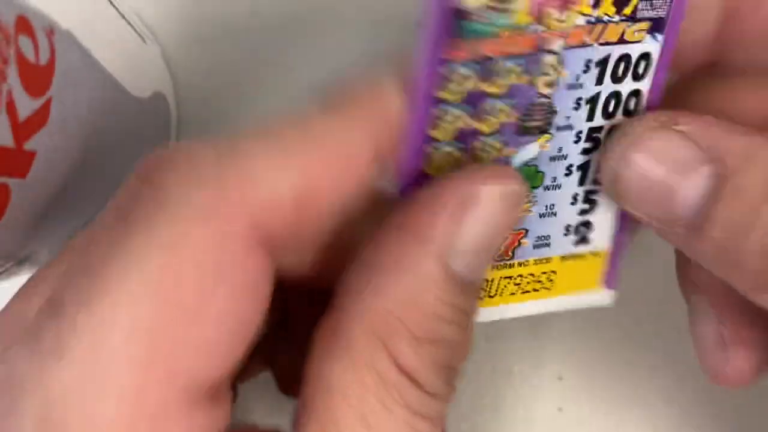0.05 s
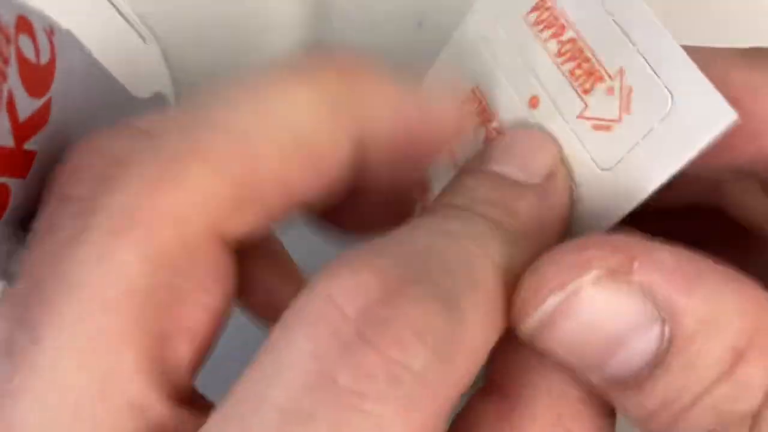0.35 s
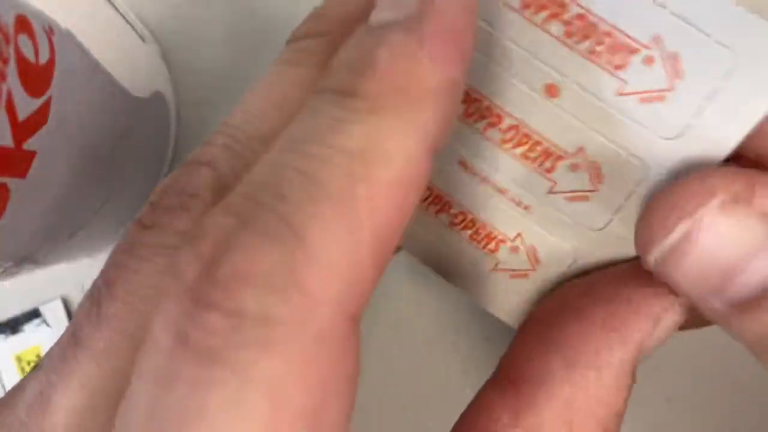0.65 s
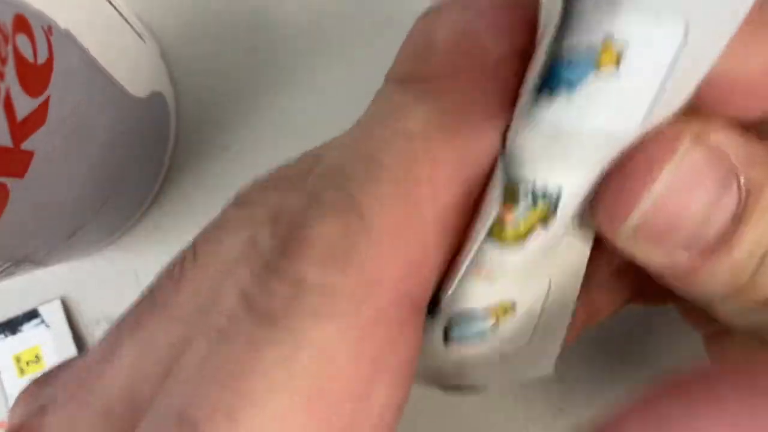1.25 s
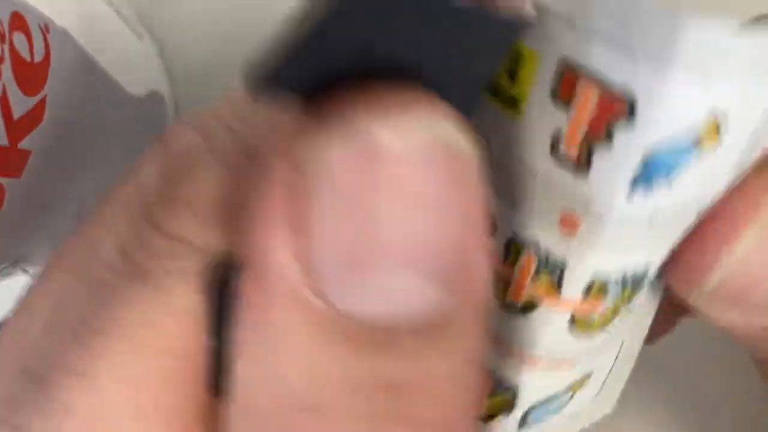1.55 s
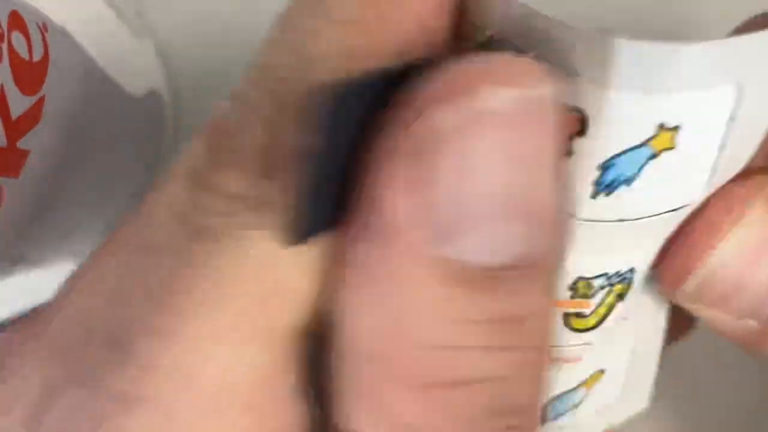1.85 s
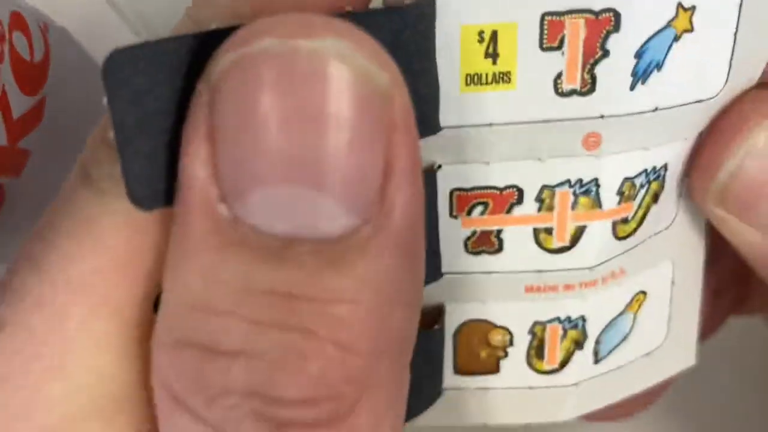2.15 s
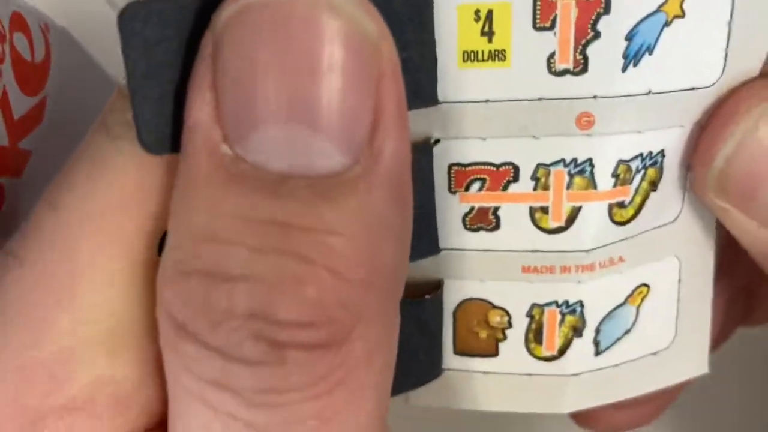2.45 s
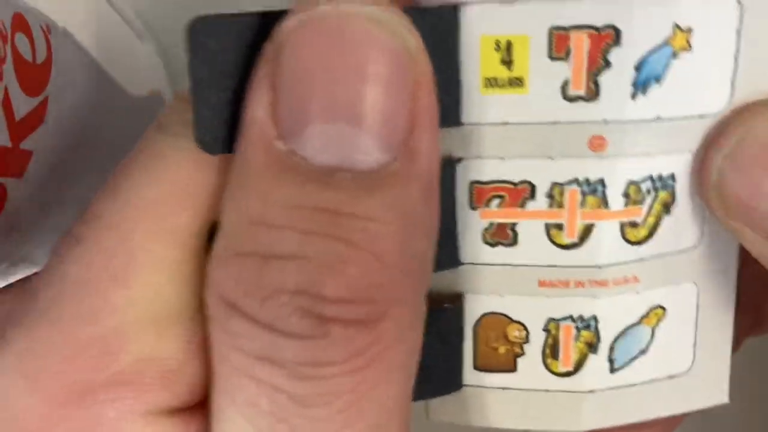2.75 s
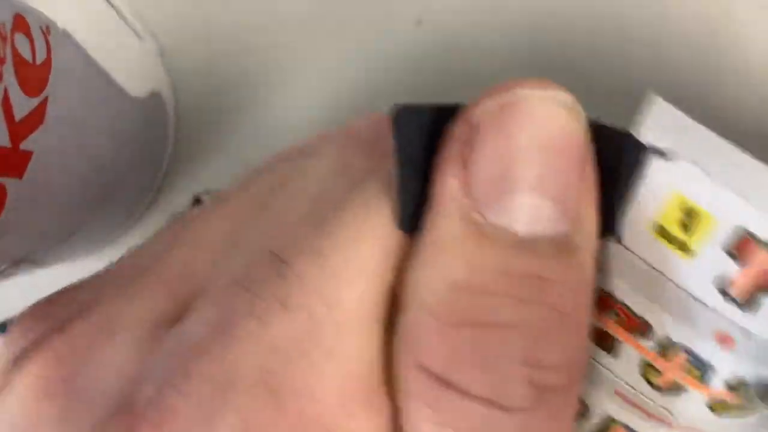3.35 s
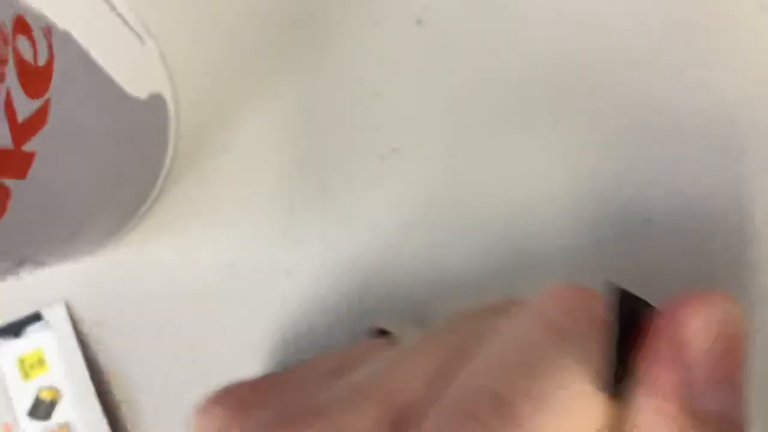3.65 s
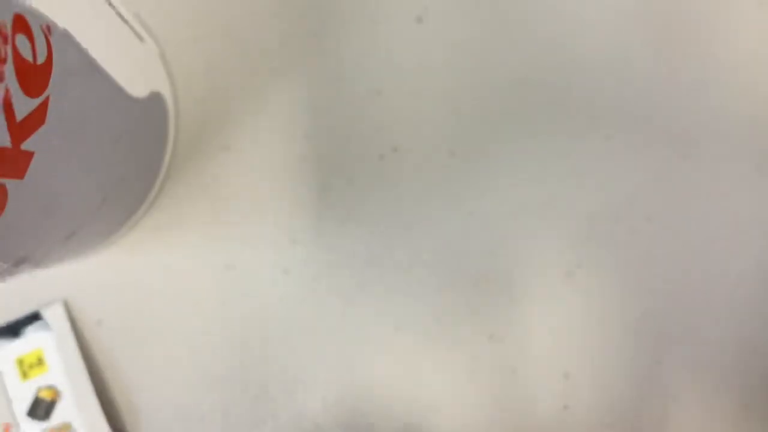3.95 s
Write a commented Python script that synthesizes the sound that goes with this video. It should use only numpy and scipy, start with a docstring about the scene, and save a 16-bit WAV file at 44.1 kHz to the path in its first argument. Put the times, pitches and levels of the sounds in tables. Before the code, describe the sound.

A stiff paper card rustles in the hands, creaks, and its tabs snap open in two short bursts. Light handling follows, then a brisk flick with snaps and soft knocks, heard up close in a small, humming room.

```python
"""Hands turn a stiff paper card close to the microphone and pull its perforated tabs open.
Over room rumble and hum, fingers slide and nails tick on the card; it bends and creaks at 0.9 s.
Paper bridges break in two quick runs of snaps, at 1.0 and 1.4 s; a limiter ducks after the loudest.
Two more snaps follow by 1.9 s, then light handling and a second creak at 2.8 s.
Near 3.45 s the card flicks with snaps, a sharp slide and knocks; faint knocks and slides end it."""
import sys
import numpy as np
from scipy import signal
from scipy.fft import rfft, irfft, next_fast_len
from scipy.io import wavfile
from scipy.ndimage import uniform_filter1d, minimum_filter1d, map_coordinates

SR = 44100
rng = np.random.default_rng(int(sys.argv[2]) if len(sys.argv) > 2 else 0)


def master(y):
    """Save y as 16-bit WAV."""
    cut = np.clip(np.atleast_2d(y).T, -1, 1)
    pcm = np.round(cut * 32767)  # scale
    wavfile.write(sys.argv[1], SR, pcm.astype(np.int16))


N = 4 * SR

# Ventilation noise. Each row: frequency in Hz, relative density in dB.
ROOM_SPECTRUM = [(15, -48), (25, -29), (53, 3), (170, -9.5), (260, -6), (600, -17), (800, -17),
                 (1270, -26.5), (2010, -31), (3530, -38.5), (15500, -49)]
# Room noise above the bass. Each row: time in seconds, relative level in dB.
ROOM_LEVEL = [(0, -34), (.4, -35), (.8, -36), (1.2, -35), (2.1, -38.5), (3, -38.5), (4, -39.5)]
# Room width. Each row: frequency in Hz, left-right correlation.
ROOM_CORRELATION = [(60, 0.96), (150, 0.77), (380, 0.19), (950, -0.76), (2380, 0.23), (5980, -0.4),
                    (15000, 0.016)]
# Machine hum. Each row: frequency in Hz, level in dB.
HUM_TONES = [(64, -47.5), (120, -48.5), (156, -53), (261, -55.5), (331, -54)]
# Wall reverberation. Each row: frequency in Hz, T60 in seconds.
WALL_T60 = [(200, 0.11), (3000, 0.19), (8000, 0.27), (15000, 0.16)]
# Balance of room and card. Each row: frequency in Hz, left minus right in dB.
ROOM_PAN = [(100, 1.5), (300, -2.5), (1500, -1), (6000, -0.5)]
BODY_PAN = [(200, 1), (600, -1.5), (1100, -38), (2800, -12), (4500, -12.5), (6500, 0.5)]
# Resonances of the held card. Each row: frequency in Hz, width in Hz, gain in dB.
CARD_MODES = [(1140, 160, -8), (2200, 120, -8), (2890, 190, -6.5), (3840, 420, -7.5)]
# Spectra of slides (hiss, rub) and snaps (crack, body).
# Each row: frequency in Hz, relative density in dB.
HISS_SPECTRUM = [(1000, -56), (3800, 3.5), (6000, -11.5), (7300, 10.5), (9000, 7), (12000, 6), (15600, 4),
                 (16300, -35)]
RUB_SPECTRUM = [(150, -19), (500, 6.5), (1200, 10.5), (1700, 6.5), (2500, 7), (4000, -1), (6000, -4.5),
                (9000, -19)]
CRACK_SPECTRUM = [(1000, -29), (4500, -23), (6000, -4), (7600, 7.5), (9300, 2), (11500, 2.5), (13500, -2.5),
                  (15500, -2), (16800, -16.5)]
BODY_SPECTRUM = [(100, 3), (350, 2.5), (900, 2), (1700, -2.5), (2400, -2.5), (3100, -3), (3900, -0.5),
                 (5500, -6), (7500, -9.5), (12000, -61)]
# Skin and card sliding on card. Each row: peak time, rise and fall in seconds, hiss and rub in dB.
SLIDES = [(.06, 0.043, 0.066, -51, -63), (.315, 0.041, 0.029, -47.5, -49.5),
          (0.441, 0.015, 0.0071, -37, -34.5), (.475, 0.063, 0.016, -46.5, -67),
          (0.567, 0.021, 0.0076, -37, -42.5), (.65, 0.036, 0.035, -49.5, -71),
          (.97, 0.066, 0.13, -44, -48.5), (1.28, 0.052, 0.04, -37, -50.5),
          (1.396, 0.033, 0.025, -31.5, -48), (1.439, .014, 0.015, -46, -37),
          (1.68, 0.23, 0.049, -45.5, -50.5), (1.753, 0.024, 0.021, -40, -44.5),
          (1.83, 0.026, 0.026, -39.5, -56), (1.96, 0.061, 0.038, -39.5, -52),
          (2.07, 0.046, 0.039, -48.5, -52.5), (2.83, 0.037, 0.075, -53, -52),
          (3.05, 0.079, 0.049, -44, -59), (3.14, .04, 0.067, -52, -60), (3.335, 0.079, 0.074, -40, -47),
          (3.451, 0.015, 0.019, -22, -39), (3.467, 0.011, 0.0062, -16.5, -27.5),
          (3.496, 0.047, 0.0056, -30, -40), (3.82, 0.11, 0.11, -56, -52),
          (3.984, 0.065, 0.018, -43.5, -53.5)]
# Soft knocks of card and fingers. Each row: start in seconds, level in dB, pitch in Hz.
KNOCKS = [(.441, -27, 1270), (0.478, -20.5, 1180), (0.96, -26.5, 816), (1.4033, -15.5, 920),
          (1.8659, -12, 860), (3.4436, -16, 1100), (3.452, -15.5, 980), (3.455, -28, 820),
          (3.453, -11.5, 246), (3.467, -18.5, 320), (3.5403, -24, 725), (3.676, -36, 775),
          (3.803, -34, 730)]
# Creaks of the bent card. Each row: start and end in seconds, first and last slip in dB.
CREAKS = [(0.8821, 0.977, -40, -31), (2.8394, 2.889, -29.5, -56)]
# Ticks of nails and card edges. Each row: start in seconds, crack and body in dB.
TICKS = [(0.1979, -34, -34), (0.282, -47, -39), (.4375, -30, -41), (.4774, -26.5, -48), (0.568, -29, -50),
         (.937, -19, -26), (.958, -29, -33), (0.9772, -30, -29), (1.053, -26, -29), (1.085, -20, -22),
         (1.701, -31, -38), (1.736, -32, -28), (1.975, -28, -46), (2.029, -33, -43), (2.0746, -17, -35),
         (2.246, -42.5, -52), (2.3309, -34.5, -38), (2.423, -35.5, -59), (2.814, -40, -35),
         (3.225, -38, -60), (3.254, -31, -58), (3.27, -28.5, -42), (3.343, -23.5, -37), (3.401, -23, -58)]
# Bridges breaking, creases popping.
# Each row: start in seconds, crack and body in dB, length in seconds, flap low cut in Hz.
SNAPS = [(0.9801, -4, -23.5, 0.0028, 1500), (0.9964, 3, -13, 0.0027, 1600), (1.0113, -7, -16, 0.0042, 1100),
         (1.036, -1.5, -19, 0.0055, 900), (1.0409, 3, -13.5, 0.0015, 750),
         (1.3777, -4.5, -15.5, 0.0017, 298), (1.3834, -4.5, -15, 0.002, 150),
         (1.392, -8.5, -15.5, 0.0024, 450), (1.4034, -2, -23, 0.00099, 150), (1.4139, 2, -8.5, 0.0032, 597),
         (1.4252, -5, -13.5, 0.0019, 800), (1.431, 1.5, -10, 0.0024, 590), (1.7316, -12, -24, 0.003, 400),
         (1.866, -5.5, -12, 0.0021, 120), (3.4428, -7, -19.5, 0.0043, 500),
         (3.4505, -7.5, -27, 0.0032, 200), (3.4712, -7, -22, 0.0022, 700)]


def amp(db):
    """Decibels to gain."""
    return 10 ** (np.asarray(db) / 20)


def unit(x):
    """Scale to rms 1."""
    return x / np.sqrt(np.mean(x ** 2) + 1e-20)


def along(points, hz):
    """Interpolate (Hz, value) points on a log axis."""
    knots_hz, values = np.transpose(points)
    return np.interp(np.log(hz + 1), np.log(knots_hz + 1), values)


def wobble(knots_per_s):
    """Smooth random curve."""
    return map_coordinates(rng.standard_normal(N // 8), [np.arange(N) * knots_per_s / SR], mode="wrap")


def filtered(x, response):
    """Apply a complex response, a function of Hz."""
    size = next_fast_len(N + SR // 2)
    return irfft(rfft(x, size) * response(np.fft.rfftfreq(size, 1 / SR)), size)[..., :N]


def coloured(x, spectrum, size=2048):
    """Apply a minimum-phase filter of unit energy."""
    cepstrum = irfft(np.log(amp(along(spectrum, np.fft.rfftfreq(size, 1 / SR)))))
    cepstrum[1:size // 2] *= 2
    cepstrum[size // 2 + 1:] = 0
    impulse = irfft(np.exp(rfft(cepstrum)))
    return signal.fftconvolve(x, impulse / np.linalg.norm(impulse))[:N]


def add(track, start_s, sound):
    """Mix a sound into a track."""
    i = int(np.clip(round(start_s * SR), 0, N))
    track[i:i + len(sound)] += sound[:N - i]


def strike(t, rise_s, decay_s):
    """Linear rise, exponential fall, peak 1."""
    return np.clip(t / rise_s, 0, 1) * np.exp(-np.maximum(t - rise_s, 0) / decay_s)


def placed(x, right_lag_ms=0, pan=((1, 0),)):
    """Place a sound in stereo by delay and balance."""
    sides = np.array([[1], [-1]])
    def response(hz):
        gain = amp(sides * along(pan, hz) / 2)
        delay = np.exp(1j * np.pi * sides * hz * right_lag_ms / 1000)
        return gain / np.sqrt(np.mean(gain ** 2, 0)) * delay
    return filtered(x, response)


def ventilation(patch_db=2.5, bass_db=-41, bass_hz=110, gain_db=1):
    """Air rumbles in slow patches; the bass holds while the rest eases down."""
    def mid_side(hz):
        angle = np.arccos(np.clip(along(ROOM_CORRELATION, hz), -1, 1)) / 2
        return amp(along(ROOM_SPECTRUM, hz)) * np.array([np.cos(angle), np.sin(angle)])
    bins = signal.stft(rng.standard_normal((2, N)), nperseg=2048)[2]
    patches = uniform_filter1d(rng.standard_normal(bins.shape[1:]), size=3, axis=0)
    patches = unit(uniform_filter1d(patches, size=5, axis=1))
    noise = signal.istft(bins * amp(patch_db * patches), nperseg=2048)[1][:, :N]
    mid, side = filtered(noise, mid_side)
    air = unit(np.array([mid + side, mid - side]))
    bass = filtered(air, lambda hz: 1 / (1 + (hz / bass_hz) ** 4))
    upper_db = np.interp(np.arange(N) / SR, *np.transpose(ROOM_LEVEL))
    return amp(gain_db) * (amp(bass_db) * bass + amp(upper_db) * (air - bass))


def machine_hum(waver_db=3.5, drift_rad=1.26):
    """Low machine tones waver in level and phase."""
    t, hum = np.arange(N) / SR, np.zeros(N)
    for hz, db in HUM_TONES:
        peak = np.sqrt(2) * amp(db + waver_db * wobble(6))
        hum += peak * np.sin(2 * np.pi * hz * t + drift_rad * wobble(5.9))
    return hum


def echoes(x, wall_db, desk_db):
    """Quick scatter from desk and hands, then the faint tail of the walls."""
    hz, frame_s, bins = signal.stft(rng.standard_normal((2, SR // 3)), SR, nperseg=256)
    decay = amp(-60 * frame_s / along(WALL_T60, hz)[:, None])
    tail = signal.istft(bins * decay, SR, nperseg=256)[1]
    t = np.arange(tail.shape[1]) / SR
    desk = rng.standard_normal(tail.shape) * strike(t, rise_s=0.0028, decay_s=0.0013)
    tail *= amp(wall_db) / np.linalg.norm(tail[0])
    desk *= amp(desk_db) / np.linalg.norm(desk[0])
    return signal.fftconvolve(x[None], tail + desk, axes=1)[:, :N]


def card_ring(x):
    """The stiff card adds short resonances to whatever excites it."""
    def response(hz):
        return 1 + sum(amp(db) * 1j * hz * width_hz / (mode_hz ** 2 - hz ** 2 + 1j * hz * width_hz)
                       for mode_hz, width_hz, db in CARD_MODES)
    return filtered(x, response)


def slides(grains_per_s=840, catches_per_s=150, catch_db=-9.5):
    """Strokes swell and fade; the paper's grain flutters and catches under them."""
    t, hiss_power, rub_power = np.arange(N) / SR, np.zeros(N), np.zeros(N)
    for peak_s, rise_s, fall_s, hiss_db, rub_db in SLIDES:
        swell = np.exp(-2 * ((t - peak_s) / np.where(t < peak_s, rise_s, fall_s)) ** 2)
        hiss_power += amp(hiss_db) ** 2 * swell
        rub_power += amp(rub_db) ** 2 * swell
    flutter = wobble(grains_per_s) + 0.59 * wobble(90)
    caught = rng.random(N) < catches_per_s / SR
    catches = amp(catch_db) * unit(caught * rng.uniform(-1.13, 1, N))
    def grain(depth_db):
        return unit(unit(amp(depth_db * flutter) * rng.standard_normal(N)) + catches)
    hiss = coloured(np.sqrt(hiss_power) * grain(depth_db=2.5), HISS_SPECTRUM)
    rub = coloured(np.sqrt(rub_power) * grain(depth_db=3), RUB_SPECTRUM)
    return hiss, rub


def knocks(rise_s=0.00054, decay_at_1khz_s=0.002, scuff_db=-7):
    """The hand-damped card rings for a few cycles with a little scuff."""
    ring, scuff, t = np.zeros(N), np.zeros(N), np.arange(SR // 16) / SR
    for start_s, db, hz in KNOCKS:
        envelope = amp(db) * strike(t, rise_s, decay_at_1khz_s * np.sqrt(1000 / hz))
        add(ring, start_s, envelope * np.sin(2 * np.pi * hz * t))
        add(scuff, start_s, envelope * rng.standard_normal(len(t)))
    return ring + amp(scuff_db) * coloured(scuff, RUB_SPECTRUM)


def fibre_ticks(per_s=12, crack_db=-46.5):
    """Tick rows: fibres of the held card tick at random, with no body."""
    times_s = rng.random(200)[:int(per_s * N / SR)] * N / SR
    return [(start_s, crack_db, -np.inf) for start_s in times_s]


def creaks(gap_s=0.0103, jitter_s=0.00074, body_offset_db=-1.5):
    """Tick rows: the bent card slips almost regularly, growing or fading along each run."""
    rows = []
    for start_s, end_s, first_db, last_db in CREAKS:
        for slip_s, draw in zip(np.arange(start_s, end_s, gap_s), rng.standard_normal(20)):
            db = np.interp(slip_s, [start_s, end_s], [first_db, last_db])
            rows.append((slip_s + jitter_s * draw, db, db + body_offset_db))
    return rows


def stray_fibres(per_snap=4, scatter_s=0.0043, offset_db=-36):
    """Tick rows: a few fibres part weakly around each snap."""
    return [(start_s + scatter_s * draw, crack_db + offset_db, body_db + offset_db)
            for start_s, crack_db, body_db, *_ in SNAPS for draw in rng.standard_normal(per_snap)]


def snaps_and_ticks(tick_s=0.0017, tick_low_hz=350, lead_s=0.008):
    """A break opens with a bright crack; the flap buzzes until the bridge parts, then stops dead."""
    body_rise_s, body_decay_s = 0.0013, 0.00065
    crack, body, t = np.zeros(N), np.zeros(N), np.arange(SR // 32) / SR - lead_s
    faint_ticks = fibre_ticks()
    ticks = [(*row, tick_s, tick_low_hz) for row in TICKS + stray_fibres() + creaks() + faint_ticks]
    lead_in = amp(-46) * np.exp(-np.abs(t) / 0.00057)  # faint, very short swell of noise into each snap
    for start_s, crack_db, body_db, length_s, low_hz in SNAPS + ticks:
        noise = np.sign(rng.standard_normal((2, len(t))))
        burst = strike(t, rise_s=0.00028, decay_s=0.49 * length_s)
        buzz = np.clip(t / body_rise_s, 0, 1) * np.exp(-np.maximum(t - length_s, 0) / body_decay_s)
        low_cut = signal.butter(2, low_hz, "high", fs=SR)
        flap = signal.lfilter(*low_cut, (lead_in + buzz) * noise[1])
        add(crack, start_s - lead_s, amp(crack_db) * (lead_in + burst) * noise[0])
        add(body, start_s - lead_s, amp(body_db) * flap)
    return coloured(crack, CRACK_SPECTRUM), coloured(body, BODY_SPECTRUM)


def scene():
    """Small room; the card's body sits right; treble, delayed and inverted on the right, sounds wide."""
    crack, body = snaps_and_ticks()
    hiss, rub = slides()
    treble = crack + hiss
    card = card_ring(body + rub) + knocks()
    direct = placed(treble, right_lag_ms=0.304) * [[1], [-1]]
    direct += placed(card, right_lag_ms=-0.423, pan=BODY_PAN)
    wet = echoes(treble, wall_db=-28.5, desk_db=-16.5) + echoes(card, wall_db=-14, desk_db=-9)
    room = placed(ventilation() + machine_hum(), pan=ROOM_PAN)
    return room + wet + direct


def record(dry, ceiling_db=-11, hold_s=0.082, release_db_per_s=81, top_hz=16700):
    """A fast rms limiter ducks, holds and recovers; a hard band limit follows."""
    power = uniform_filter1d(np.mean(dry ** 2, 0), size=44)
    level_db = 10 * np.log10(np.abs(power) + 1e-12)
    hold = int(hold_s * SR)
    held_db = minimum_filter1d(np.minimum(ceiling_db - level_db, 0), hold, origin=(hold - 1) // 2)
    release_db = release_db_per_s * np.arange(N) / SR
    gain_db = np.minimum.accumulate(held_db - release_db) + release_db
    gain_db = uniform_filter1d(minimum_filter1d(gain_db, size=60), size=60)  # smooth attack
    return filtered(dry * amp(gain_db), lambda hz: hz < top_hz)


dry = scene()
out = record(dry)
master(out)
```